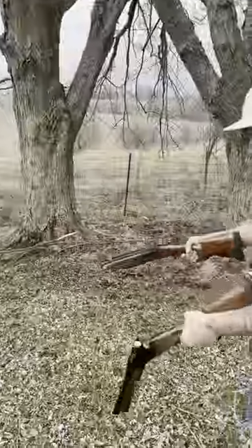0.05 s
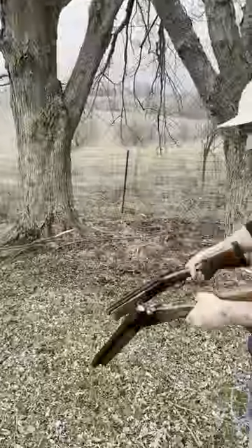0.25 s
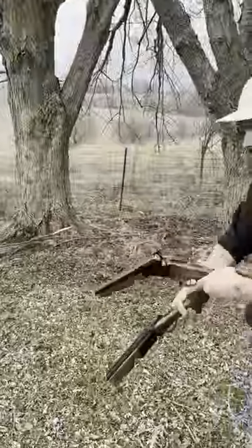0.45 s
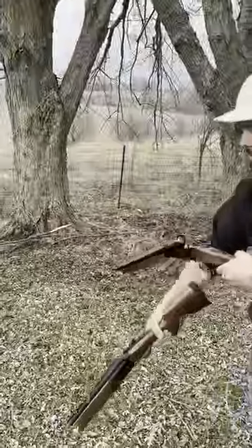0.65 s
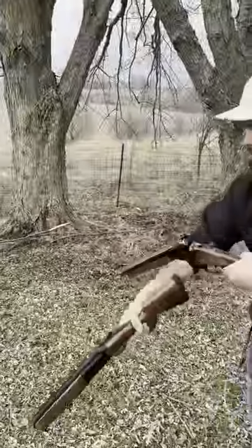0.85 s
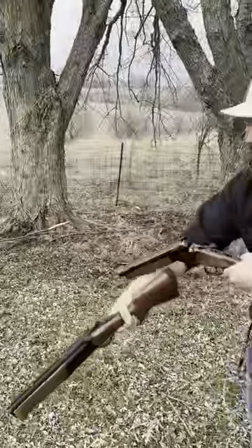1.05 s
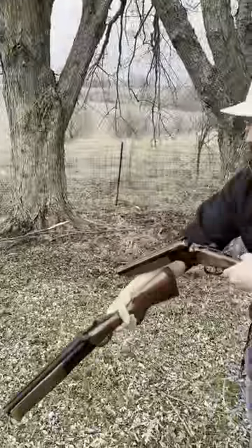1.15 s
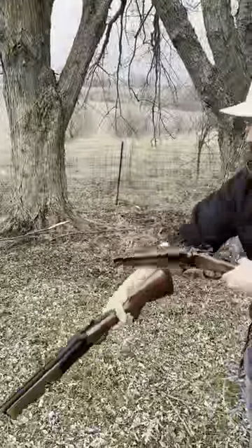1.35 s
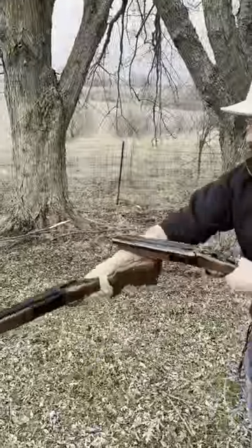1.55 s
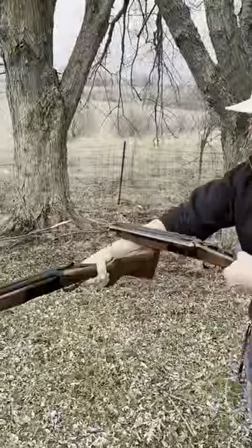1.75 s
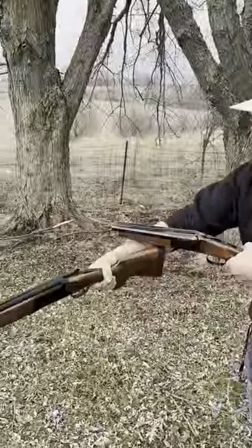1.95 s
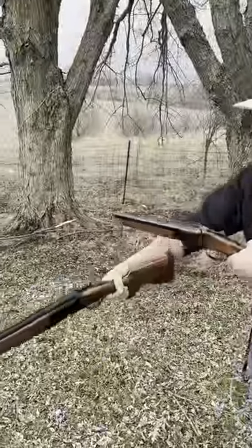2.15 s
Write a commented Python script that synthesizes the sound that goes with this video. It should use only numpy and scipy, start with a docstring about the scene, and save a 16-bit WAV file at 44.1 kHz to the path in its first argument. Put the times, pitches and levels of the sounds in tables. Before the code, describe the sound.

Sharp steel clack of a double-barrel shotgun closing, brief hinge scrape before, faint wind around

```python
"""Outdoors in open country, a break-action shotgun is swung shut close to the microphone. The hinge scrapes
with a rising rasp; each steel contact is a noise crack plus damped modes. The barrels slam on the breech, the
bolt drops in, the action rattles softly and the loose fore-end clucks. Gusts, puffs and thuds of low noise bump
the microphone over a wide, quiet hiss of shaped noise. Sleeves rustle and tick as grainy noise, and a far
bird's wavering sine notes barely show."""
import sys
import numpy as np
from scipy import signal
from scipy.fft import rfft, irfft, next_fast_len
from scipy.io import wavfile
from scipy.ndimage import uniform_filter1d, map_coordinates

SR = 44100
rng = np.random.default_rng(int(sys.argv[2]) if len(sys.argv) > 2 else 0)


def persist_wave(psi):
    """Save psi, clipped to +-1, as 16-bit WAV."""
    counts = np.round(np.clip(psi, -1, 1) * 32767).astype(np.int16)
    wavfile.write(sys.argv[1], SR, np.atleast_2d(counts).T)


N = 97020  # samples, 2.2 s

# Hiss of open country: spectrum [freq_hz, level_db]
AIR_SPECTRUM = [(20, -22), (65, -8), (160, -3.5), (250, -7), (600, -8.5), (1100, -18.5), (1900, -18),
                (2700, -17), (5500, -21.5), (8200, -18.5), (11000, -23), (12300, -47), (16000, -23)]
# How alike the hiss is in both channels [freq_hz, correlation]
AIR_LIKENESS = [(60, 0.99), (250, 0.82), (640, 0.38), (1400, 0.41), (3000, 0.27), (7000, 0.37),
                (15000, 0.077)]
AIR_DB, AIR_DRIFT_DB = -56.5, 0.67
AIR_LEFT_LEAD_S = 0.00014

# Strength of the wind on the microphone, before the trim [time_s, level_db]
GUST_LEVELS = [(0.0, -51), (0.15, -49), (0.2, -41), (0.245, -50), (0.31, -23.5), (0.42, -19.5),
               (0.455, -27), (0.48, -46), (0.53, -45), (0.58, -57), (0.64, -49), (0.67, -61), (0.85, -54),
               (0.91, -46), (0.98, -45.5), (1.17, -43.5), (1.26, -72), (1.37, -63), (1.41, -55),
               (1.505, -55), (1.6, -56), (2.01, -60), (2.05, -48.5), (2.12, -65), (2.2, -64)]
# Spectrum of the gusts' buffeting [freq_hz, level_db]
BUFFET_SPECTRUM = [(20, -40), (30, -20), (42, -5.5), (60, 2), (100, -3), (130, -16), (190, -17.5),
                   (280, -34), (500, -50.5), (1200, -72), (4000, -100)]
BUFFET_TRIM_DB, BUFFET_SIDE_DB, BUFFET_LEFT_DB = -1.6, -27, .55
EDDY_S = .03  # span over which turbulence is levelled
# Short puffs that bump the microphone [peak_s, level_db]
PUFFS = [(0.186, -48), (0.271, -46.5), (.315, -38), (0.344, -33.5), (.41, -36), (.505, -41), (0.643, -53),
         (0.881, -47), (0.966, -47), (1.009, -43), (1.072, -42), (1.151, -46), (2.04, -49.5)]
# Spectrum of a puff [freq_hz, level_db]
PUFF_SPECTRUM = [(30, -9), (100, 2), (210, -1.5), (330, -8.5), (550, -24.5), (1500, -53), (4000, -90)]
PUFF_LENGTH_S = .03
# Large eddies that thud softly [peak_s, length_s, level_db]
THUDS = [(.207, .055, -29), (1.53, .035, -45)]
# Spectrum of a thud [freq_hz, level_db]
THUD_SPECTRUM = [(25, -20), (62, 0), (95, -5), (160, -35), (500, -80)]
WIND_CUT_HZ = 25  # the microphone passes little wind below this

# Notes of the far bird [peak_s, length_s, pitch_hz, level_db]
WHISTLES = [(.785, .12, 2480, -66), (2.14, .07, 2520, -61)]
WHISTLE_WAVER_HZ = 70

# Brushes of the sleeves [peak_s, length_s, level_db]
SWISHES = [(0.283, 0.098, -63), (0.56, .09, -60.5), (0.83, 0.11, -61), (2.08, .025, -61), (2.156, .05, -61)]
# Spectrum of the rustle [freq_hz, level_db]
CLOTH_SPECTRUM = [(500, -14.5), (2500, -5), (5000, -7.5), (8500, -0.5), (11000, -5.5), (12500, -13),
                  (16000, -10)]
RUSTLE_DB, RUSTLE_ROUGH_DB = -64.5, 3.5  # ceaseless small stirring of cloth and grass
# Ticks of hands and twigs [start_s, level_db, treble_db]
TICKS = [(.168, -45.5, -4), (.198, -55, 2), (.213, -55, 2), (.297, -51, 1), (0.3256, -53, 6),
         (0.4916, -45.5, 3), (0.650, -48, 7), (.690, -46, -9), (.909, -54, 0), (0.9333, -53, 3),
         (1.051, -51, -1), (1.082, -51, 10), (1.284, -54, 1), (1.702, -55, 2), (1.974, -53, 5),
         (2.0547, -52, 4)]
# Spectrum of a tick [freq_hz, level_db]
TICK_SPECTRUM = [(500, -5), (2800, 1), (5500, -4), (9000, 5), (16000, -12)]
TICK_T60_S = 0.017

# Spectrum of steel rubbing in the hinge [freq_hz, level_db]
SCRAPE_SPECTRUM = [(200, -22), (700, -7), (2100, -1), (3000, -4), (4100, -4), (5300, -9), (9500, -2),
                   (16000, -19)]
SCRAPE_FROM_S, SCRAPE_TO_S = 1.352, 1.402
SCRAPE_END_DB, SCRAPE_GROWS_DB, SCRAPE_ROUGH_DB = -44, 10, 4.5
RASP_MIDDLE_S, RASP_LENGTH_S, RASP_DB = 1.385, .024, -43.5
RASP_FROM_HZ, RASP_TO_HZ = 1600, 5000
RASP_FLUTTER_RATE = 1000  # random knots a second; faster makes the rasp wider

SLAM_S, BOLT_DELAY_S = 1.4013, .0033  # barrels meet the breech; the locking bolt follows
# Steel contacts in the action [start_s, level_db, bass_db, treble_db]
CONTACTS = [(1.3481, -28, -4, -1), (1.3625, -24, -12, 10), (1.3712, -20, -4, 1), (1.3779, -24, -4, -7),
            (1.3875, -28, -18, 11), (1.3926, -26, -10, 8), (SLAM_S, 0.3, -1.5, 0.5),
            (SLAM_S + BOLT_DELAY_S, -8.2, 15.5, -11), (1.4095, -26, -2, 9), (1.4180, -28.5, -1, 1),
            (1.4348, -21, 14, -2), (1.4374, -21, 14, -20), (1.4430, -19.5, -8, 2), (1.4454, -26, 1, -4),
            (1.4785, -38, -4, -14), (1.485, -40, 9, -3), (1.5573, -27.5, 7.5, -19), (1.5635, -33, 7, -21),
            (1.5672, -31.5, -2, 1)]
BASS_HZ, TREBLE_HZ = 780, 4040  # where a contact's weight and hardness take hold
# Damped modes rung at every contact [freq_hz, level_db, t60_s]
GUN_MODES = [(268, -35.5, .082), (493, -26, .032), (605, -22, .025), (691, -23, .028), (880, -25.5, .038),
             (1096, -18.8, .029), (1494, -16.8, .014), (1796, -17, .019), (2067, -8.7, .01),
             (2263, -24, .016), (2710, -27.4, .022), (3254, -18.5, .02), (3505, -34, .026),
             (4860, -34, .024), (5905, -36.8, .028), (6800, -22.5, .019), (8144, -34.4, .028),
             (9320, -28.8, .023), (10120, -38, .03)]
# The tubes sing on after each contact [freq_hz, level_db, t60_s]
TUBE_MODES = [(1120, -51, 0.65), (1197, -59, .4), (1938, -64, 0.26), (3030, -67, .22)]
RISE_CYCLES, MODE_SCATTER_DB = 0.68, .6
# Spectrum of a contact's crack [freq_hz, level_db]
CRACK_SPECTRUM = [(200, -18), (700, -7), (2200, -2), (3300, -3), (4600, -12), (6600, -5), (7800, -10),
                  (9800, -3), (12000, -8), (13500, -18), (16000, -11)]
CRACK_DB, CRACK_T60_S, CRACK_RISE_S = -12, .016, .0002
# Clucks of the loose fore-end [start_s, level_db, pitch_hz]
CLUCKS = [(1.4435, -23.7, 1068), (1.4490, -35, 1264), (1.4824, -36.5, 1267), (1.5713, -41.5, 1204)]
# Modes of the fore-end [pitch_multiple, level_db, t60_s]
FOREND_MODES = [(1, 0, .028), (1.19, -10, .026), (1.62, -7, .026), (2.92, -14, .028)]
RADIATES_HZ = 197  # gun and handling give off little below this
RIGHT_LEAD_S = 3e-5

# Echo from ground and trees [freq_hz, t60_s]
YARD_DECAY = [(200, 0.39), (1500, 0.23), (4000, 0.31), (12000, 0.13)]
YARD_DB = -19
TOP_HZ = 16200  # band limit


def amp(db):
    """Decibels to gain."""
    return 10 ** (np.asarray(db) / 20)


def unit(x):
    """Scale to rms 1."""
    return x / np.sqrt(np.mean(x ** 2) + 1e-20)


def along(points, hz):
    """Read a curve of (frequency, value) points on a log frequency axis."""
    freq, value = np.transpose(points)
    return np.interp(np.log(hz + 1), np.log(freq + 1), value)


def wobble(rate):
    """A smooth random curve with rate knots a second."""
    knots = rng.standard_normal(int(N * rate / SR) + 4)
    return map_coordinates(knots, [np.arange(N) * rate / SR])


def filtered(x, response):
    """Shape a sound by a response over frequency."""
    n = x.shape[-1]
    padded = next_fast_len(n + 8192)
    spectrum = rfft(x, padded) * response(np.fft.rfftfreq(padded, 1 / SR))
    return irfft(spectrum, padded)[..., :n]


def noise(spectrum, size):
    """Coloured noise of rms 1."""
    return unit(filtered(rng.standard_normal(size), lambda hz: amp(along(spectrum, hz))))


def shelf(hz, corner_hz):
    """Glide from 0 well below the corner to 1 well above."""
    return 1 - 1 / (1 + (hz / corner_hz) ** 4)


def fade(t, t60):
    """Exponential decay, 60 dB down after t60."""
    return np.exp(-np.log(1000) * t / t60)


def swell(peak_s, length_s):
    """A smooth rise and fall around a peak."""
    return np.cos(np.pi * np.clip((np.arange(N) / SR - peak_s) / length_s, -.5, .5))


def add(track, start_s, sound):
    """Mix a sound into the track at its start time."""
    part = track[round(start_s * SR):][:len(sound)]
    part += sound[:len(part)]


def from_side(x, left_lead_s):
    """Let the left channel hear the sound a little earlier; a negative lead favours the right."""
    ears = np.array([[1], [-1]])
    return filtered(x, lambda hz: np.exp(1j * np.pi * hz * left_lead_s * ears))


def air():
    """The wide, quiet hiss of breeze over grass and bare trees, as noise partly shared by both channels."""
    def turn(hz):
        return np.arccos(np.clip(along(AIR_LIKENESS, hz), -1, 1)) / 2

    mid = filtered(noise(AIR_SPECTRUM, size=N), lambda hz: np.cos(turn(hz)))
    side = filtered(noise(AIR_SPECTRUM, size=N), lambda hz: np.sin(turn(hz)))
    level = amp(AIR_DB + AIR_DRIFT_DB * wobble(rate=11.8))
    return level * np.array([mid + side, mid - side])


def eddies(spectrum):
    """Low turbulence, levelled to an even strength."""
    flow = noise(spectrum, size=N)
    power = np.abs(uniform_filter1d(flow ** 2, int(EDDY_S * SR)))
    return flow / np.sqrt(power + 1e-6)


def wind():
    """Eddies press on the microphone as hard as the gust of the moment, with puffs and soft thuds on top."""
    gust = amp(np.interp(np.arange(N) / SR, *np.transpose(GUST_LEVELS)) + BUFFET_TRIM_DB)
    puff_level = sum(amp(db) * swell(peak_s, PUFF_LENGTH_S) for peak_s, db in PUFFS)
    thud_level = sum(amp(db) * swell(peak_s, length_s) for peak_s, length_s, db in THUDS)
    mid = gust * eddies(BUFFET_SPECTRUM)
    mid = mid + puff_level * eddies(PUFF_SPECTRUM) + thud_level * eddies(THUD_SPECTRUM)
    mid = filtered(mid, lambda hz: shelf(hz, WIND_CUT_HZ))
    side = gust * amp(BUFFET_SIDE_DB) * noise(BUFFET_SPECTRUM, size=N)
    return np.array([(mid + side) * amp(BUFFET_LEFT_DB), (mid - side) * amp(-BUFFET_LEFT_DB)])


def bird():
    """Thin whistled notes, sines whose pitch wavers at random, barely above the hiss."""
    waver = WHISTLE_WAVER_HZ * wobble(rate=90)
    out = np.zeros(N)
    for peak_s, length_s, pitch_hz, db in WHISTLES:
        phase = 2 * np.pi * np.cumsum(pitch_hz + waver) / SR
        out += amp(db) * swell(peak_s, length_s) * np.sin(phase)
    return out


def handling():
    """Cloth fibres catch and slip in a grainy rustle, swelling as sleeves brush, with faint dry ticks."""
    level = amp(RUSTLE_DB) + sum(amp(db) * swell(peak_s, length_s) for peak_s, length_s, db in SWISHES)
    grain = amp(RUSTLE_ROUGH_DB * (wobble(rate=70) + wobble(rate=500)))
    out = level * unit(noise(CLOTH_SPECTRUM, size=N) * grain)
    t = np.arange(SR // 10) / SR
    for start_s, db, treble_db in TICKS:
        tick = noise(TICK_SPECTRUM, size=len(t))
        tick = filtered(tick, lambda hz: amp(treble_db * shelf(hz, TREBLE_HZ)))
        add(out, start_s, amp(db) * tick * fade(t, TICK_T60_S))
    return out


def hinge():
    """Steel rubs on steel ever harder as the breech closes; the rasp climbs in pitch as the joint tightens."""
    t = np.arange(N) / SR
    progress = (t - SCRAPE_FROM_S) / (SCRAPE_TO_S - SCRAPE_FROM_S)
    level_db = SCRAPE_END_DB + SCRAPE_GROWS_DB * (np.clip(progress, 0, 1) - 1)
    level_db = level_db + SCRAPE_ROUGH_DB * wobble(rate=600)
    rubbing = (progress > 0) & (progress < 1)
    rub = noise(SCRAPE_SPECTRUM, size=N) * amp(level_db) * rubbing

    half_s = RASP_LENGTH_S / 2
    hz = np.interp(t, [RASP_MIDDLE_S - half_s, RASP_MIDDLE_S + half_s], [RASP_FROM_HZ, RASP_TO_HZ])
    phase = 2 * np.pi * np.cumsum(hz) / SR
    # two random envelopes in quadrature make a narrow noise band around the glide
    rasp = wobble(RASP_FLUTTER_RATE) * np.sin(phase) + wobble(RASP_FLUTTER_RATE) * np.cos(phase)
    envelope = np.sqrt(np.abs(swell(RASP_MIDDLE_S, RASP_LENGTH_S)))
    return rub + amp(RASP_DB) * envelope * rasp


def ring(modes, t, colour=np.ones_like):
    """Damped modes that swell within about a cycle, with levels scattered anew at every call."""
    hz, db, t60 = np.transpose(modes)[:, :, None]
    gain = colour(hz) * amp(db + MODE_SCATTER_DB * rng.standard_normal(hz.shape))
    rise = 1 - np.exp(-t * hz / RISE_CYCLES)
    return np.sum(gain * np.sin(2 * np.pi * hz * t) * fade(t, t60) * rise, axis=0)


def action():
    """Each steel contact cracks and rings the gun; bass gives it weight, treble gives it hardness."""
    out = np.zeros(N)
    t, t_long = np.arange(SR // 10) / SR, np.arange(SR // 2) / SR
    tubes = ring(TUBE_MODES, t_long)
    crack_envelope = fade(t, CRACK_T60_S) * (1 - np.exp(-t / CRACK_RISE_S))
    for start_s, db, bass_db, treble_db in CONTACTS:
        def colour(hz):
            return amp(bass_db * (1 - shelf(hz, BASS_HZ)) + treble_db * shelf(hz, TREBLE_HZ))

        crack = filtered(noise(CRACK_SPECTRUM, size=len(t)), colour) * crack_envelope
        body = ring(GUN_MODES, t, colour)
        add(out, start_s, amp(db) * (body + amp(CRACK_DB) * crack))
        add(out, start_s, amp(db) * tubes)
    for start_s, db, pitch_hz in CLUCKS:
        add(out, start_s, amp(db) * ring(np.multiply(FOREND_MODES, [pitch_hz, 1, 1]), t))
    return out


def yard(x):
    """A thin scattered echo off ground and trees: decaying noise, different in each channel."""
    hz, t, grains = signal.stft(rng.standard_normal((2, SR // 2)), SR, nperseg=256)
    decay = fade(t, along(YARD_DECAY, hz)[:, None])
    tail = signal.istft(grains * decay, SR, nperseg=256)[1]
    return signal.fftconvolve(x[None], tail / np.linalg.norm(tail[0]), axes=1)[:, :N]


def scene():
    """The gun and sleeves, slightly to the right, with their echo in wind and open air."""
    background = from_side(air() + wind() + bird(), AIR_LEFT_LEAD_S)
    highpass = signal.butter(3, RADIATES_HZ, "highpass", fs=SR, output="sos")
    gun = signal.sosfilt(highpass, handling() + hinge() + action())
    return background + amp(YARD_DB) * yard(gun) + from_side(gun, -RIGHT_LEAD_S)


def record(dry):
    """Keep nothing above the band limit."""
    return filtered(dry, lambda hz: hz < TOP_HZ)


dry = scene()
out = record(dry)
persist_wave(out)
```